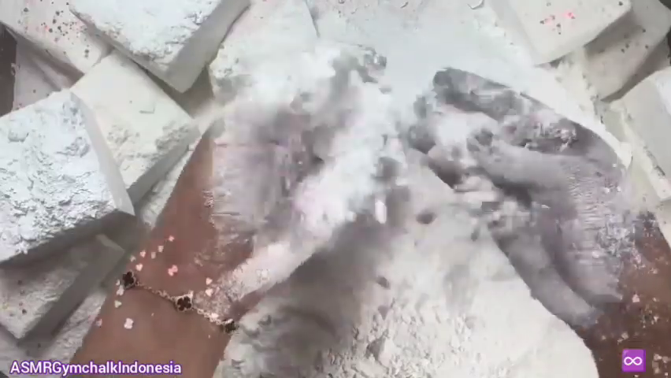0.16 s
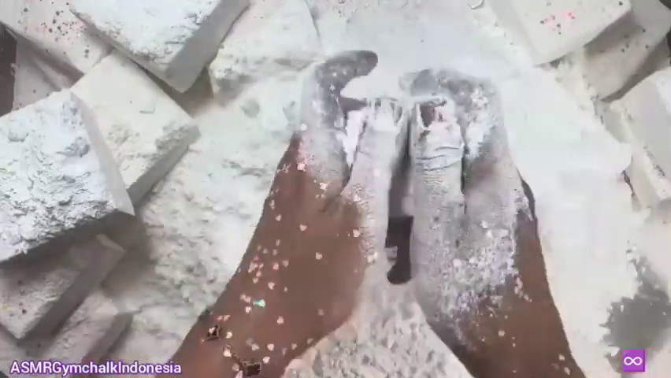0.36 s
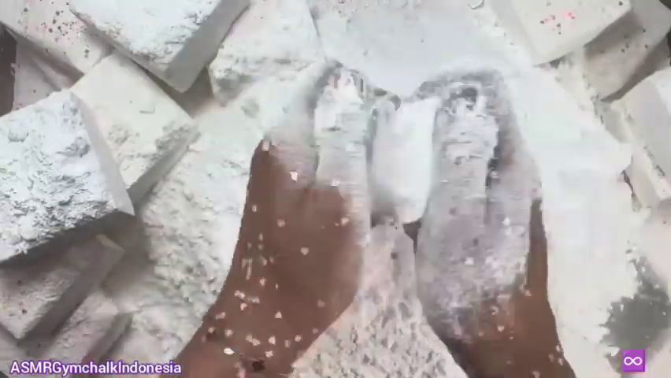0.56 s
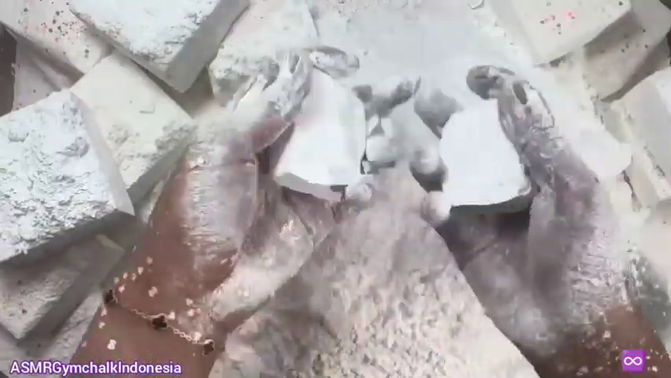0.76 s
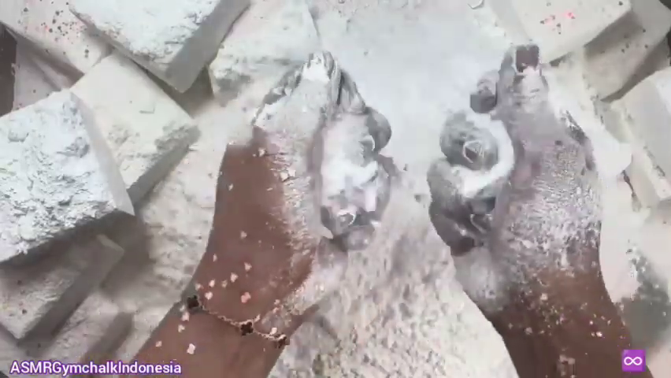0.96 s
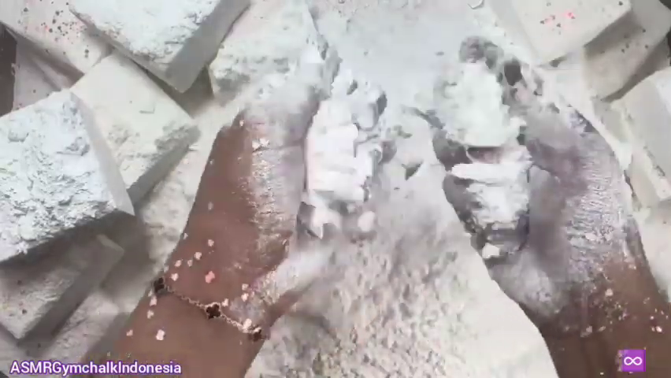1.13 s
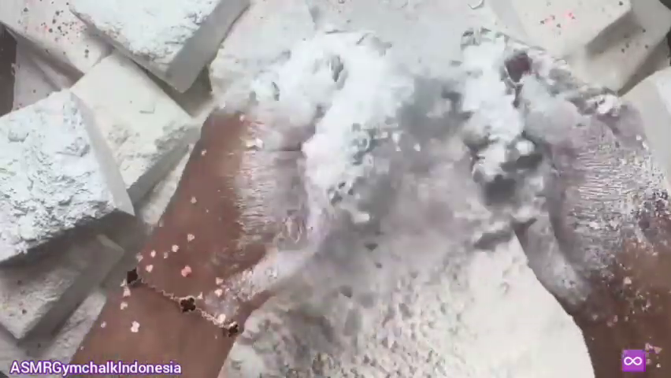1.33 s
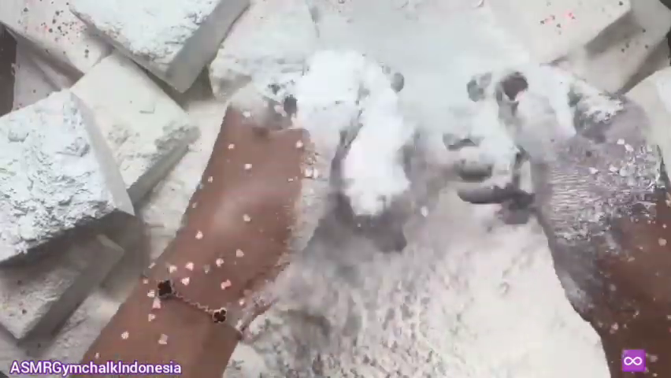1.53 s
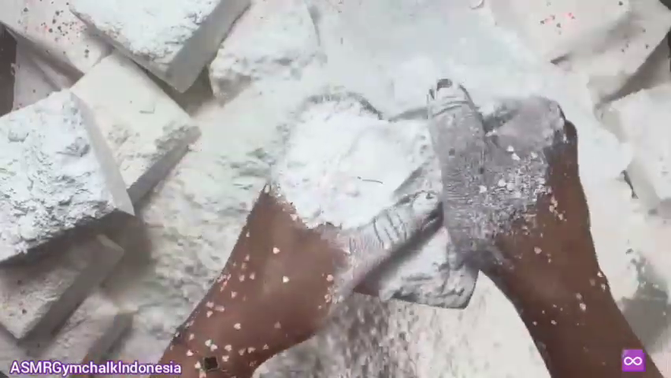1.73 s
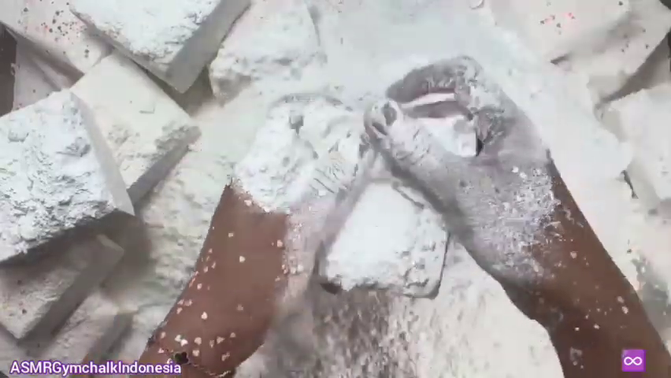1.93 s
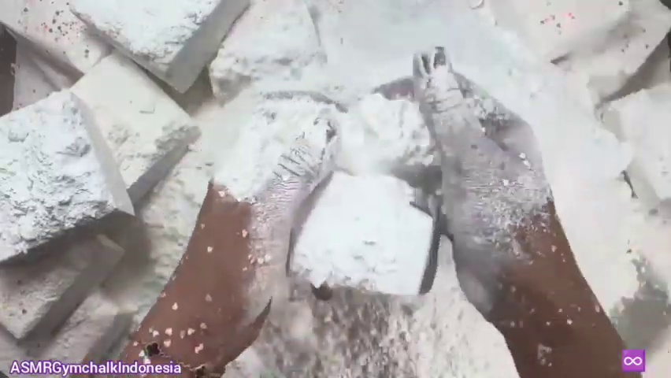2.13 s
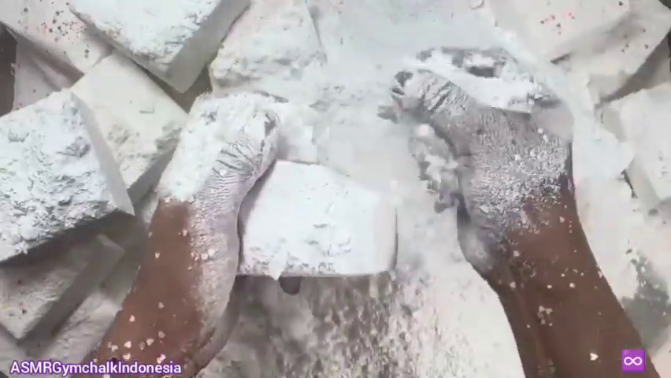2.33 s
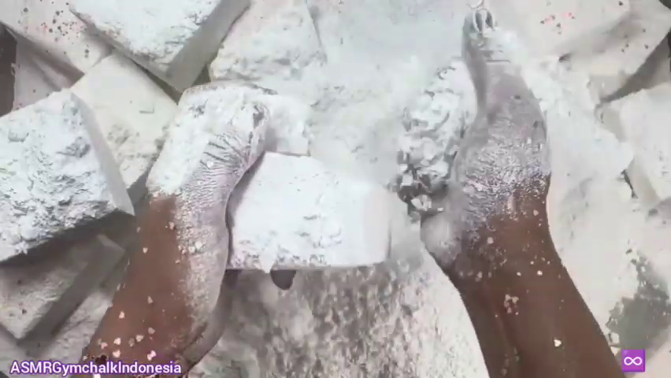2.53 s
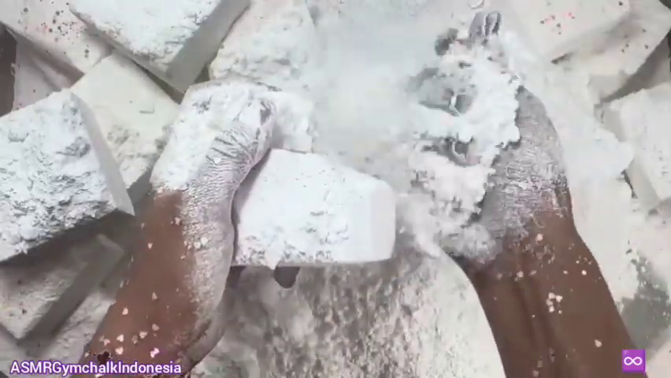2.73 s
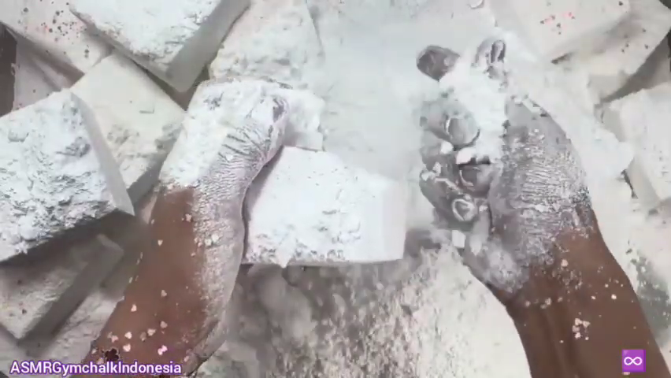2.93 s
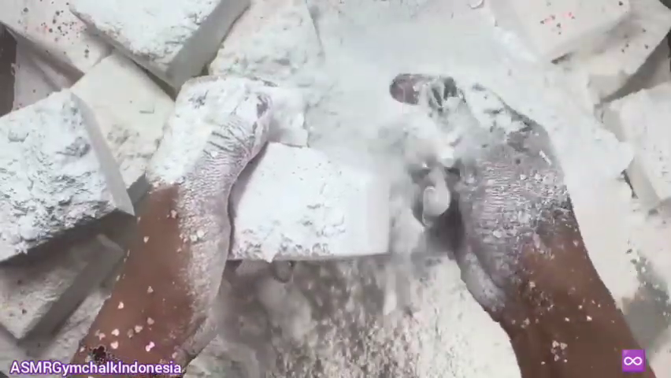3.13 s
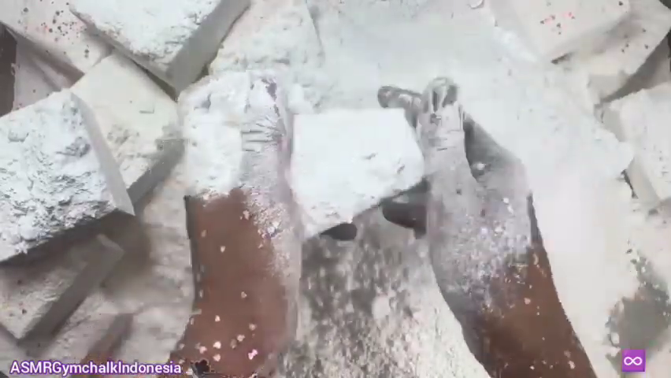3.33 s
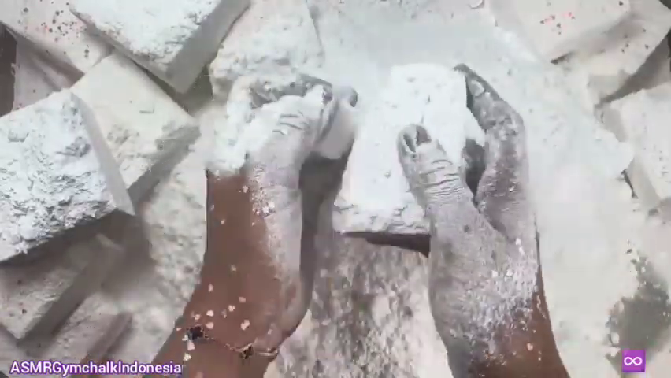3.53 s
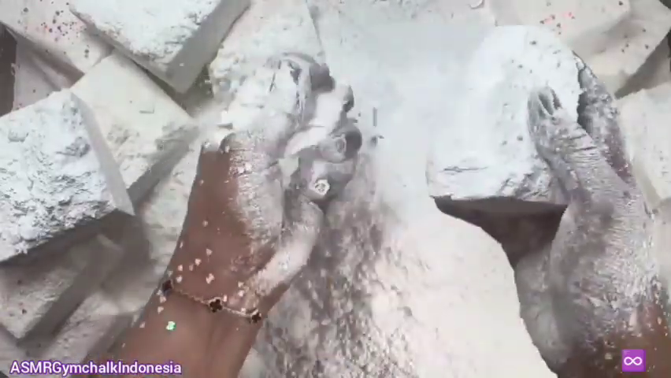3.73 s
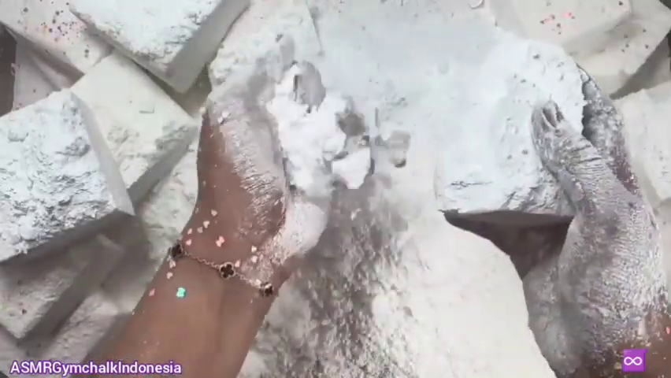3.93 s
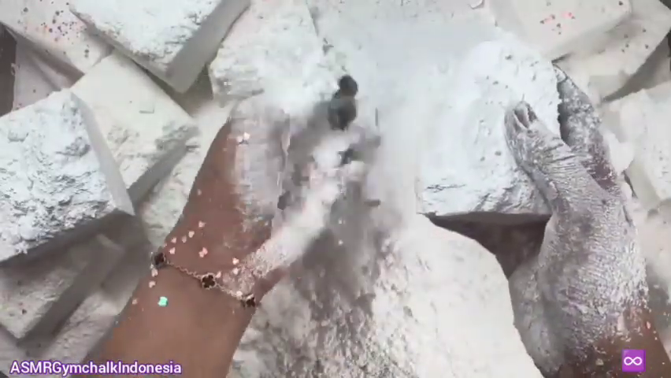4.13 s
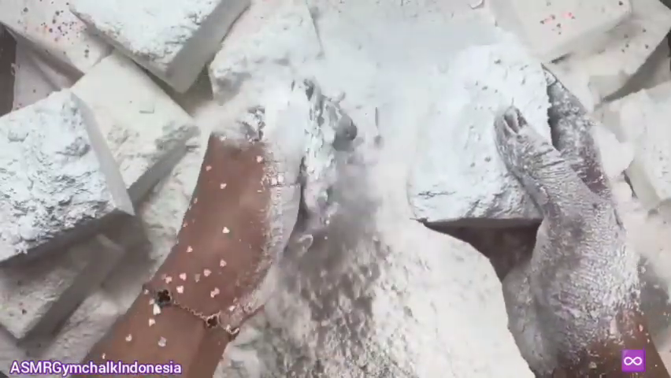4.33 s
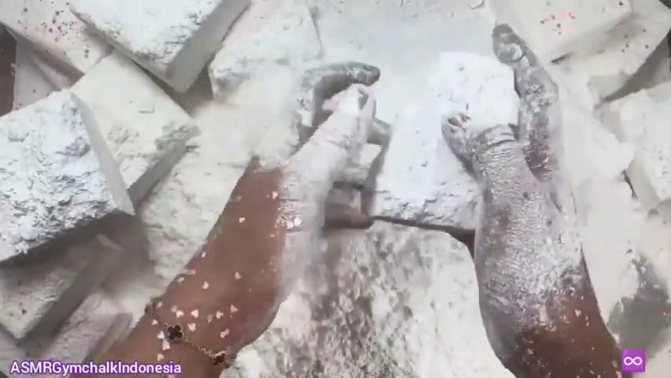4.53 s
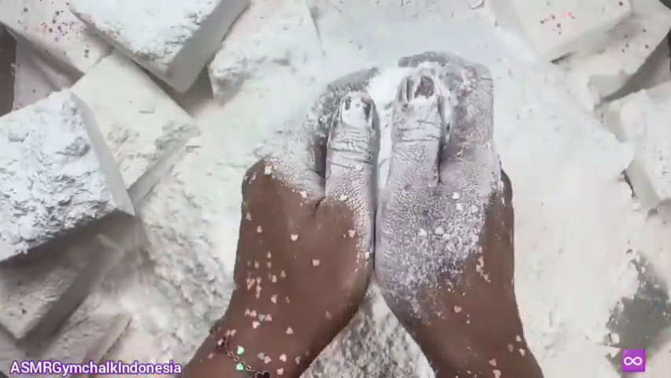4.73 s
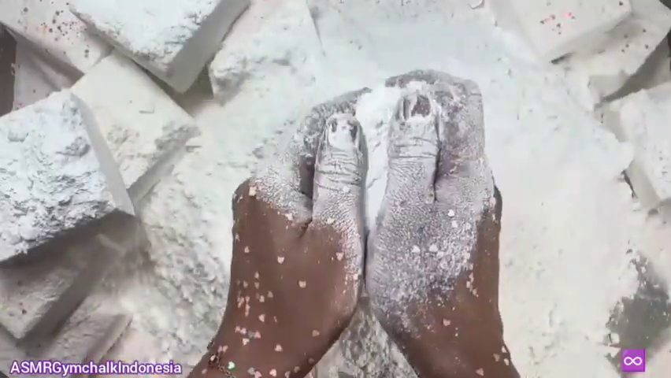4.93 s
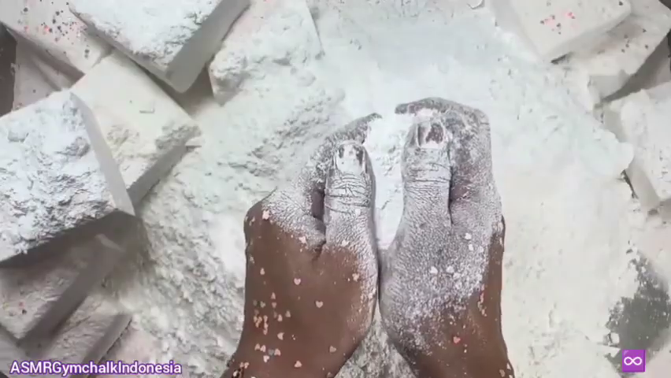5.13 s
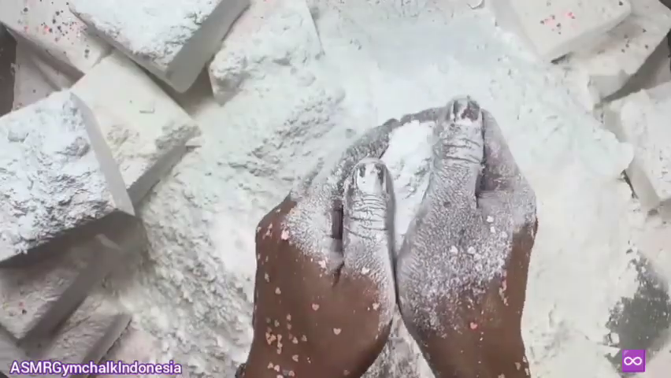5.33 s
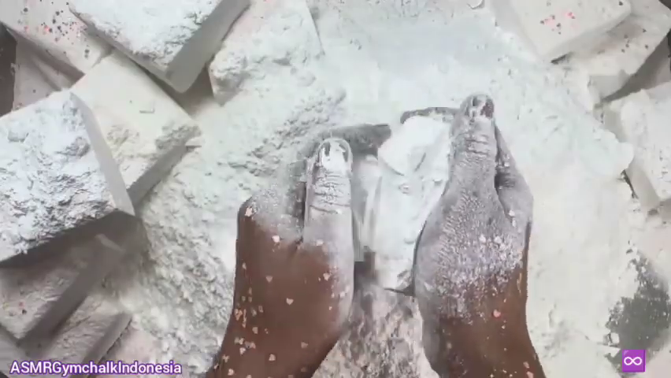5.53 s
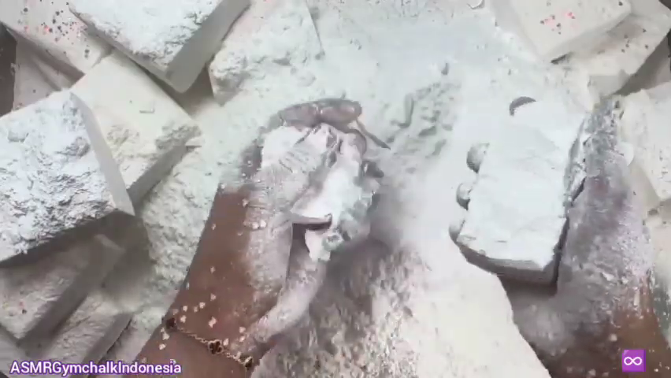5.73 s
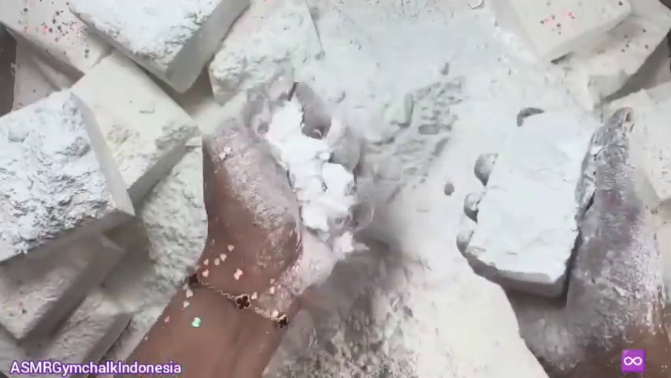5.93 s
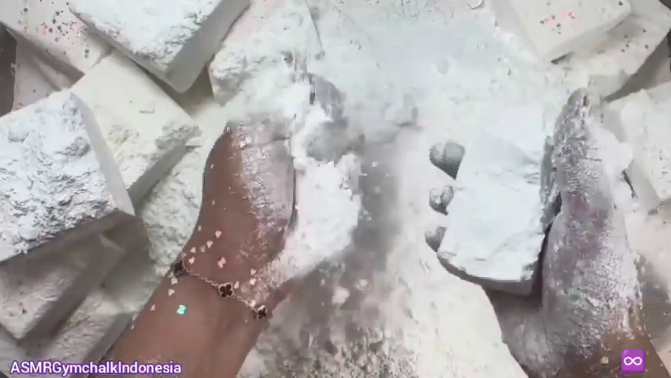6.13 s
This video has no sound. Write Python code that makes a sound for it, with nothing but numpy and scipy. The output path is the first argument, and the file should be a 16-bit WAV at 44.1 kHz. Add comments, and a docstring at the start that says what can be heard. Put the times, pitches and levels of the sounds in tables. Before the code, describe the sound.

Bare hands squeeze and break dry chalk in ragged crackling bursts, with soft thumps, quiet rubs and one hard crack near the end.

```python
"""Bare hands press dry chalk blocks together and crumble them close to a small stereo microphone.
Faint room hum lies under the first squeezes, which crunch as ringing grains and hissing noisy powder.
Within the first second blocks snap in ragged bursts, and thumps ring the work surface and the heap.
Through the middle, squeezes, snaps and chips alternate with rubs and squeaks; crumbs patter on the heap.
After a quieter strain of the palms near 5 s comes the hardest blow, then a last run of fractures."""
import sys
import numpy as np
from scipy import signal
from scipy.fft import rfft, irfft
from scipy.io import wavfile
from scipy.ndimage import uniform_filter1d

SR = 44100
rng = np.random.default_rng(int(sys.argv[2]) if len(sys.argv) > 2 else 0)


def master_out(mix):
    """Clip the mix to full scale and print it as 16-bit PCM to the path in sys.argv[1]."""
    frames = np.transpose(np.atleast_2d(mix))
    ceiling = np.clip(frames, -1, 1)
    pcm = np.round(ceiling * 32767).astype(np.int16)
    wavfile.write(sys.argv[1], SR, pcm)


N = 272538  # samples, about 6.2 s


def amp(db):
    """Amplitude factor of a level in dB."""
    return 10 ** (np.asarray(db) / 20)


def evened(x):
    """The signal scaled to rms 1."""
    return x / np.sqrt(np.mean(x ** 2) + 1e-20)


def read(points, hz):
    """A spectrum joined by straight lines on a log frequency axis."""
    f, value = np.transpose(points)
    return np.interp(np.log(hz + 1), np.log(f), value)


def add(mix, s, sound):
    """Lay a sound into the mix from second s, cut at the end of the mix."""
    part = mix[max(round(s * SR), 0):][:len(sound)]
    part += sound[:len(part)]


def colour(x, points, size=4096):
    """Causal minimum-phase filter of unit energy with the given spectrum."""
    hz = abs(np.fft.fftfreq(size, 1 / SR))
    log_gain = np.log(amp(read(points, hz)))
    minimum_phase = np.exp(np.conj(signal.hilbert(log_gain)))
    taps = np.fft.ifft(minimum_phase).real[:size // 2]
    return signal.oaconvolve(x, taps / np.linalg.norm(taps))[:len(x)]


def wander(rate_hz):
    """Slow random drift of rms 1: noise that falls away steeply above the rate."""
    hz = np.fft.rfftfreq(N, 1 / SR)
    return evened(irfft(rfft(rng.standard_normal(N)) / (1 + (hz / rate_hz) ** 4), N))


def scatter(t60, size=8192):
    """Dense, dying random reflections of unit energy; t60 in seconds."""
    t = np.arange(size) / SR
    onset = 1 - np.exp(-t / 0.00011)
    taps = rng.standard_normal(size) * amp(-60 * t / t60) * onset
    return taps / np.linalg.norm(taps)


def ring(modes, t):
    """Dying modes; each spot that is struck favours other ones."""
    place_db = rng.uniform(-2, 2, len(modes))
    total = 0
    for (hz, db, t60), extra_db in zip(modes, place_db):
        total = total + amp(db + extra_db - 60 * t / t60) * np.sin(2 * np.pi * hz * t)
    return total


def grains(per_s, spread_db, cycles, patch_db, count=44):
    """Tiny breaks of uneven size, each ringing a few cycles; the mix of crumb sizes keeps changing."""
    out, t = np.zeros(N), np.arange(400) / SR
    breaks = int(per_s * N / SR / count)  # for each crumb size
    for hz in np.geomspace(500, 16000, count):
        patches = rng.standard_normal(220)
        when, weight, sign = rng.random((3, 6000))[:, :breaks]  # when: share of the whole scene
        size_db = spread_db * np.minimum(-np.log(1 - weight), 3.5)
        size_db += patch_db * np.interp(when, np.linspace(0, 1, len(patches)), patches)
        clicks = np.bincount((when * N).astype(int), amp(size_db) * np.sign(sign - .5), N)
        ringing = hz * np.sin(2 * np.pi * hz * t) * np.exp(-t * hz / cycles)
        out += signal.oaconvolve(clicks, ringing)[:N]
    return evened(out)


# Colour of the room behind the hands: f/Hz, relative level per Hz/dB
ROOM_SPECTRUM = [(20, -42), (45, -19), (65, -1), (90, -18.5), (130, -19), (220, -18.5), (335, -11),
                 (450, -39), (1000, -99), (2000, -71), (6000, -36), (10000, -124), (12000, -72)]


def room_hum(level_db=-47):
    """Room background: low, unsteady hum with a trace of hiss, made of filtered noise."""
    return amp(level_db) * colour(rng.standard_normal(N), ROOM_SPECTRUM)


# Palms straining on a block before it gives: start t/s, length/s, level/dB
STRAINS = [(.43, 0.16, -37), (4.976, 0.76, -49.5)]
# Squeezes of the fingers: start t/s, rise/s, hold/s, relative powder level/dB,
# grit: coarse crunch against powder/dB, falling crumbs level/dB
FINGER_SQUEEZES = [(0, 0.0017, 0.082, -30, 7.5, -29), (0.15, 0.039, .14, -30.5, 6, -32),
                   (0.467, 0.011, 0.0097, -32.5, -6, -37), (0.572, 0.011, 0.12, -37, -12, -36.5),
                   (0.736, 0.045, .05, -31, 2, -34), (0.814, .045, 0.071, -19, 4.5, -25),
                   (0.962, .01, 0.05, -22, 7.5, -25.5), (1.012, 0.026, 0.17, -37.5, 13, -35),
                   (1.155, 0.079, 0.2, -29, 5.5, -28.5), (1.443, 0.057, 0.089, -26.5, 3, -29),
                   (1.746, 0.011, .04, -28, 2.5, -32.5), (1.915, 0.011, 0.23, -39, 0.5, -38.5),
                   (2.1, 0.18, 0.049, -33, 4, -32.5), (2.325, .008, 0.02, -22.5, 8, -22.5),
                   (2.413, 0.029, .02, -18.5, 4, -23), (2.615, 0.016, .19, -31, 5.5, -32),
                   (2.846, 0.021, 0.12, -35.5, 9.5, -33.5), (2.98, 0.087, 0.09, -32.5, 10, -29.5),
                   (3.17, 0.061, 0.089, -33.5, -21, -37.5), (3.324, 0.025, 0.2, -33, -16, -42),
                   (3.603, 0.026, .1, -29, 2, -33.5), (3.762, 0.017, .04, -28, 8, -31),
                   (3.835, 0.014, 0.089, -31.5, 5, -35.5), (3.976, 0.01, 0.0072, -31, 6, -28.5),
                   (4.06, 0.024, 0.039, -31.5, 6.5, -32), (4.152, 0.094, 0.13, -39, 9, -32.5),
                   (4.397, 0.034, 0.046, -31.5, -40, -78), (4.505, 0.036, 0.23, -42.5, -30.5, -60),
                   (4.961, 0.017, 0.025, -39.5, 4, -33), (5.184, .02, 0.034, -36.5, -2, -61),
                   (5.463, 0.012, 0.049, -22.5, -0.5, -19.5), (5.617, 0.017, 0.16, -32, 0.5, -30.5),
                   (5.705, 0.071, 0.18, -30.5, 10.5, -32.5), (5.94, 0.13, 0.053, -27.5, 1.5, -31.5)]
# A squeeze stops quickly, then loosened chalk trickles on
RELEASE_S, TRICKLE_DB, TRICKLE_S = 0.02, -7, 0.13


def squeezing(muffle_db=-14):
    """Strengths of crunch, powder and crumbs: squeezes build, hold, let go, trickle; closing palms muffle."""
    t, power = np.arange(0, N, 64) / SR, 0
    closed = 0  # 0 open, rising to 1 at the end of a strain
    for s, length, _ in STRAINS:
        closed = closed + np.clip((t - s) / length, 0, 1) * (t < s + length)
    for start, rise, hold, powder_db, grit_db, crumbs_db in FINGER_SQUEEZES:
        since = np.maximum(t - start - rise - hold, 0)
        trickle = amp(TRICKLE_DB + muffle_db * closed) * np.exp(-since / TRICKLE_S)
        release = (1 - amp(TRICKLE_DB)) * np.exp(-since / RELEASE_S) + trickle
        force = np.clip((t - start) / rise, 0, 1) ** 2 * release
        layer_gains = amp([powder_db + grit_db, powder_db, crumbs_db])
        power = power + np.outer(layer_gains, force) ** 2
    return [np.interp(np.arange(N) / SR, t, np.sqrt(layer)) for layer in power]


# Crumbs landing on the heap, with the resonances below: f/Hz, relative level per Hz/dB
PATTER_SPECTRUM = [(30, -11.5), (55, 2), (92, 8), (130, -1), (220, -7.5), (295, -2.5), (334, 8), (375, 3),
                   (430, -13.5), (488, 3.5), (550, -12), (900, -6.5), (1600, -44), (4000, -57)]


def patter(uneven_db=5):
    """Crumbs land softly with each squeeze; they and the straining palms stir the resonances below."""
    stir = squeezing()[2]
    for s, length, db in STRAINS:
        add(stir, s, amp(db) * signal.windows.tukey(int(length * SR)))
    drops = rng.standard_normal(N) * (rng.random(N) < 1500 / SR)  # 1500 a second on average
    uneven = amp(uneven_db * np.tanh(wander(rate_hz=21.3)))
    return evened(colour(drops * uneven, PATTER_SPECTRUM)) * stir


# Ring of the work surface: f/Hz, relative level/dB, t60/s
SURFACE_MODES = [(200, -23, .05), (300, 12, 0.007), (336, -1.5, 0.16), (350, -3.5, 0.07), (397, -9.5, 0.11),
                 (490.5, -4.5, 0.093), (699.6, -10.5, 0.06), (867, -19.5, 0.082)]
# The heap under a thump: f/Hz, relative level/dB, t60/s
HEAP_MODES = [(57.3, -3, 0.14), (93, 0, 0.16)]
# Air pushed out by a blow: f/Hz, relative level per Hz/dB
PUFF_SPECTRUM = [(25, -23), (70, -18), (150, -2), (350, -5.5), (600, -19.5), (1000, -9), (1500, -32.5),
                 (2200, -43), (5000, -87)]
# Blows of hands and falling lumps: t/s, relative knock level/dB, relative deep thump level/dB, rise/s
BLOWS = [(.394, -22.5, -15, 0.0049), (0.5635, -1.5, -34, 0.002), (.854, -18.5, -42, .004),
         (.918, -14.5, -46, 0.0062), (1.252, -25.5, -28, 0.0022), (1.573, -18.5, -16, 0.011),
         (1.766, -10.5, -25, 0.0031), (1.831, -23, -20, 0.005), (2.063, -18, -20.5, 0.0044),
         (2.333, -13, -16, 0.015), (2.45, -21.5, -16.5, 0.0053), (2.552, -17, -33, 0.011),
         (2.95, -18, -16.5, 0.0079), (3.58, -29, -23.5, 0.0048), (4.128, -30, -12, 0.003),
         (4.248, -21.5, -16.5, 0.021), (4.786, -37.5, -32, 0.0054), (5.247, -17.5, -13, 0.011),
         (5.47, 6.5, -12, 0.019), (5.772, -17.5, -28, 0.012), (5.848, -15.5, -22, 0.014),
         (6.08, -21, -45, 0.0038)]


def thuds(puff_s=0.0099, size=16000):
    """A blow rings the surface, pushes a deep thump through the heap and puffs out air."""
    out, t = np.zeros(N), np.arange(size) / SR
    for s, knock_db, thump_db, rise in BLOWS:
        puff = amp(-9) * colour(rng.standard_normal(size), PUFF_SPECTRUM) * np.exp(-t / puff_s)
        knock = amp(knock_db) * (ring(SURFACE_MODES, t) + puff)
        late = 1 - np.exp(-t / 0.003)  # the soft heap answers late
        thump = amp(thump_db) * (ring(HEAP_MODES, t) * late + puff)
        # a slow press keeps feeding the ring
        swell = np.minimum(t / rise, 1) ** 1.6 * np.exp(np.minimum(t, rise) / 0.093)
        add(out, s, swell * (knock + thump))
    return out


# Skin and chalk faces sliding, from dull rubs to squeaks:
# t/s, length/s, level before the swell/dB, centre f/Hz, width at half amplitude/Hz
SLIDES = [(0.394, 0.021, -38, 1060, 703), (.431, .075, -39, 900, 300), (1.09, 0.021, -33, 5700, 200),
          (1.139, .014, -30, 5900, 300), (2.558, 0.009, -34, 930, 700), (2.96, 0.013, -39, 790, 600),
          (3.245, 0.056, -34.5, 1840, 1810), (4.464, 0.041, -36, 3100, 2500),
          (4.608, 0.047, -39, 5700, 3450), (4.778, .022, -40, 804, 493), (4.962, 0.056, -46, 630, 487),
          (5.044, 0.2, -49.5, 970, 350), (5.234, 0.063, -43, 945, 690)]


def rubs():
    """Sliding friction: a swell of noise in one resonance."""
    out, hz = np.zeros(N), np.fft.rfftfreq(SR // 2, 1 / SR)
    for s, length, db, centre, width in SLIDES:
        resonance = 1 / (1 + (2 * (hz - centre) / width) ** 2)
        band = irfft(rfft(rng.standard_normal(SR // 2)) * resonance)[:int(length * SR)]
        swell = np.sin(np.linspace(0, np.pi, len(band)))
        add(out, s, amp(db) * evened(band) * swell)
    return out


# Coarse chalk grains close to the microphone, also for splinters: f/Hz, relative level per Hz/dB
CRUNCH_SPECTRUM = [(150, -4), (400, -0.5), (700, 6), (1050, 13.5), (1250, 8.5), (1480, 15.5), (1750, 10),
                   (2150, 11.5), (2500, 6.5), (2900, 8.5), (3900, -4.5), (4900, 2), (7000, -20),
                   (12000, -64)]


def splinters(level_db=-15, clump_db=3):
    """Sparse, dry ticks of single large grains that stand out of the crunch."""
    ticks = grains(per_s=260, spread_db=3.5, cycles=.8, patch_db=1, count=12)
    clumps = amp(level_db + clump_db * np.tanh(wander(rate_hz=41)))
    return colour(ticks, CRUNCH_SPECTRUM) * clumps * squeezing()[0]


# Hiss of fine powder between the fingers: f/Hz, relative level per Hz/dB
POWDER_SPECTRUM = [(1000, -6.5), (3000, -0.5), (4300, -4), (4900, -7), (5900, -1.5), (7500, -4),
                   (9000, -8.5), (10100, -12), (11000, -55), (13200, -50), (15000, -13), (16000, -38)]


def crumbling(crunch_db=-12.5, powder_db=-4.5, clump_db=3.0, powder_clump_db=2.86):
    """Coarse grains and fine powder give way together in short clumps."""
    clumps = wander(rate_hz=30)
    crunch, powder, _ = squeezing()
    coarse = grains(per_s=6000, spread_db=4, cycles=2.5, patch_db=3)
    fine = grains(per_s=22000, spread_db=2, cycles=4.5, patch_db=2.2)
    coarse = colour(coarse, CRUNCH_SPECTRUM) * amp(crunch_db + clump_db * clumps)
    fine = colour(fine, POWDER_SPECTRUM) * amp(powder_db + powder_clump_db * clumps)
    return coarse * crunch + fine * powder


# Small chips break off at random; their level is set against the crunch of that moment
CHIPS_PER_S, CHIP_DB, CHIP_SPREAD_DB = 45, -4.5, -6
CHIP_TREBLE_DB, CHIP_DECAY_S = -6.5, 0.0021  # mean tilt; middle decay, varied by an octave each way
PIECE_HZ, PIECE_OCTAVES = 2130, 0.71  # middle pitch of a chip and its range each way


def chips():
    """Small fractures at random moments, following the crunch around them; rows as in FRACTURE_EVENTS."""
    crunch_db = 20 * np.log10(squeezing()[0] + 1e-6)
    draws = rng.uniform(-1, 1, (600, 5))[:int(CHIPS_PER_S * N / SR)]
    rows = []
    for when, strength, tone, length, pitch in draws:
        at = int((when + 1) / 2 * N)
        level_db = crunch_db[at] + CHIP_DB + CHIP_SPREAD_DB * strength
        treble_db = CHIP_TREBLE_DB * (1 + tone)
        decay = CHIP_DECAY_S * 2 ** length
        piece_hz = PIECE_HZ * 2 ** (PIECE_OCTAVES * pitch)
        rows.append((at / SR, level_db, treble_db, decay, piece_hz))
    return rows


# Colour of a snap before its tilt: f/Hz, relative level per Hz/dB
SNAP_SPECTRUM = [(150, -33), (400, -6), (750, -4), (1500, -0.5), (2200, 3), (3000, 4), (4000, 3),
                 (4900, -1.5), (6200, 2), (8000, -4), (10000, -9), (11500, -33.5), (15500, -35)]
# Main fractures: t/s, relative level/dB, treble tilt about 2500 Hz/dB, decay time/s,
# ring of the loose piece f/Hz
FRACTURE_EVENTS = [(.193, -36, -15, 0.0025, 2300), (0.2355, -4, -12.5, 0.00049, 1240),
                   (0.5633, -2, -5, 0.0075, 1380), (.591, -20, 22, 0.0042, 1460),
                   (0.7915, -22, 28, .004, 3880), (.8224, -13.5, -19, 0.0017, 1050),
                   (0.845, -13, -2.5, 0.0036, 1480), (.8696, -10, 0, 0.0019, 3300),
                   (0.875, -12, -3, 0.015, 3600), (0.9065, -8.5, -1.5, 0.033, 2460),
                   (0.938, -8, -7, 0.0035, 2900), (0.9642, -7, -6, .003, 1360),
                   (0.9695, -12, -7.5, 0.0033, 1420), (1.007, -13, 1.5, .005, 2950),
                   (1.0502, -14, -8, 0.0025, 1420), (1.312, -15, -12, 0.0031, 1790),
                   (1.7661, -10, -5, 0.012, 1880), (1.9632, -23, -4.5, 0.0029, 2780),
                   (2.0492, -20, 1, 0.0034, 2480), (2.067, -17, -5.5, 0.0093, 2870),
                   (2.3365, -10, 0.5, .015, 1680), (2.359, -10, -6.5, .008, 1480),
                   (2.4527, -7.5, -4.5, 0.0096, 1500), (2.5035, -15.5, -7, .004, 1550),
                   (2.5556, -15, -14.5, 0.0044, 970), (3.085, -18, -11.5, 0.0031, 1470),
                   (3.1253, -7.5, -1, 0.0015, 1500), (3.6825, -14, -3, 0.004, 2150),
                   (3.7176, -16.5, -12.5, 0.013, 2800), (3.7858, -14.5, -7, 0.0029, 1460),
                   (3.8078, -12, -6.5, 0.0073, 1130), (4.054, -19.5, -9, 0.0025, 1800),
                   (4.0956, -18, -11, 0.0025, 1460), (4.2853, -10.5, -14, .0015, 1460),
                   (4.3108, -16.5, -13, 0.0019, 1440), (4.862, -11.5, -5.5, 0.0029, 2620),
                   (5.018, -26, 0, 0.0053, 3330), (5.4308, -41.5, -2, 0.0067, 4030),
                   (5.4751, -7, -3.5, 0.013, 2250), (5.6494, -27, -2, 0.0059, 2540),
                   (5.761, -10.5, -1.5, 0.0038, 1360), (5.8283, -13.5, -4, 0.016, 2640),
                   (5.8558, -10, -2, 0.0075, 1400), (5.8791, -10, -4, 0.0038, 2160),
                   (5.9111, -6.5, -6, 0.0038, 1390), (6.072, -19, 36, 0.0042, 1580),
                   (6.1137, -20, -18.5, 0.0089, 2900)]


def fractures(level_db=-2, debris_db=-22, debris_s=0.03, ragged_db=3, build_share=0.34,
              piece_db=-6, tick=2, size=7000):
    """A crack builds, gives with a tick, bursts raggedly, rings the loose piece and sheds debris."""
    out, t = np.zeros(N), (np.arange(size) - size // 8) / SR  # the crack gives at t = 0
    before, after = np.maximum(-t, 0), np.maximum(t, 0)
    for s, db, treble_db, decay, piece_hz in FRACTURE_EVENTS + chips():
        ragged = amp(ragged_db * evened(uniform_filter1d(rng.standard_normal(size), size=50)))
        build = np.exp(-before / np.minimum(build_share * decay, .0012))
        debris = amp(debris_db) * np.exp(-after / debris_s)
        fade = build * (np.exp(-after / decay) + debris)
        tilted = [(hz, level + treble_db * np.clip(np.log2(hz / 2500), -1, 1))
                  for hz, level in SNAP_SPECTRUM]
        source = rng.standard_normal(size) * ragged * fade + tick * (t == 0)
        burst = evened(colour(source, tilted))
        piece = signal.lfilter(*signal.iirpeak(piece_hz, 7, SR), burst)
        burst += amp(piece_db) * evened(piece)
        # the burst takes the energy of its fade
        burst *= np.linalg.norm(fade) / np.linalg.norm(burst)
        add(out, s + t[0], amp(db + level_db) * burst)
    return out


def chalk(echo_db=-14):
    """Everything granular, with short reflections from the blocks around, and the patter below."""
    direct = crumbling() + splinters() + fractures() + rubs()
    echo = signal.oaconvolve(direct, scatter(t60=0.12))[:N]
    return direct + amp(echo_db) * echo + patter()


# Spread between the two microphone ports: f/Hz, side against mid level/dB
PORT_WIDTH = [(60, -21), (120, -21), (200, -7), (350, -13), (500, -6.5), (700, 1.5), (1200, -16.5),
              (2400, -15.5), (4400, -2.5), (6200, -7), (8100, 0.5), (10000, 7.5), (12000, 35), (15000, 11)]
# How far the side follows the mid, a quarter cycle apart: f/Hz, signed share
PORT_LEAN = [(100, 0.4), (350, 0.34), (700, 0.9), (2000, 0.76), (4700, 1), (5500, -0.5), (8000, -0.3),
             (10000, -0.4), (15000, 0.2)]


def ports(mid, scattered):
    """Two ports agree in the bass, drift out of phase in the treble and catch different scattered sound."""
    hz = np.fft.rfftfreq(N, 1 / SR)
    lean = np.clip(read(PORT_LEAN, hz), -1, 1)
    shifted = 1j * lean * rfft(mid)
    unrelated = np.sqrt(1 - lean ** 2) * rfft(scattered)
    side = irfft(amp(read(PORT_WIDTH, hz)) * (shifted + unrelated), N)
    return np.array([mid + side, mid - side])


def scene():
    """The chalk, the blows and the room at the two close microphone ports."""
    return ports(chalk() + thuds() + room_hum(), scattered=chalk() + room_hum())


EDGE_HZ = 16200  # upper band limit


def record(dry):
    """The hardest blows overload the microphone and clip; then a low-pass sets the band limit."""
    clipped = np.clip(dry, -.96, .96)
    taps = signal.firwin(511, EDGE_HZ, window=("kaiser", 9), fs=SR)
    return signal.oaconvolve(clipped, taps[None], "same")


dry = scene()
out = record(dry)
master_out(out)
```